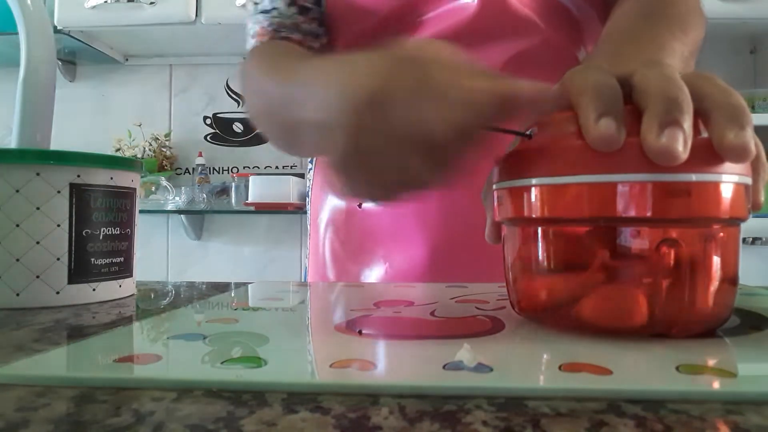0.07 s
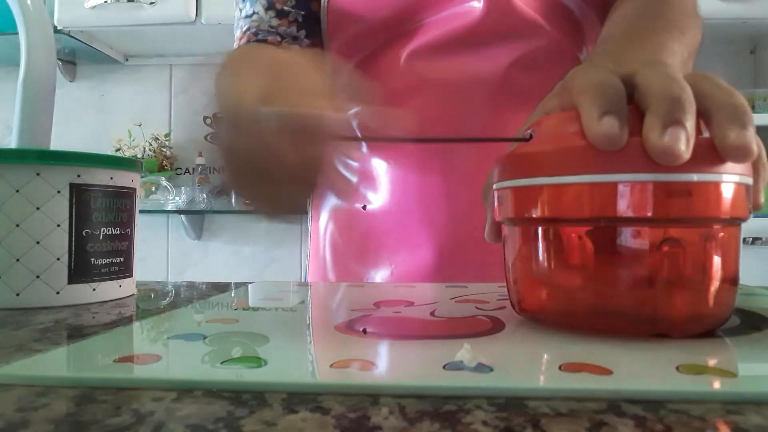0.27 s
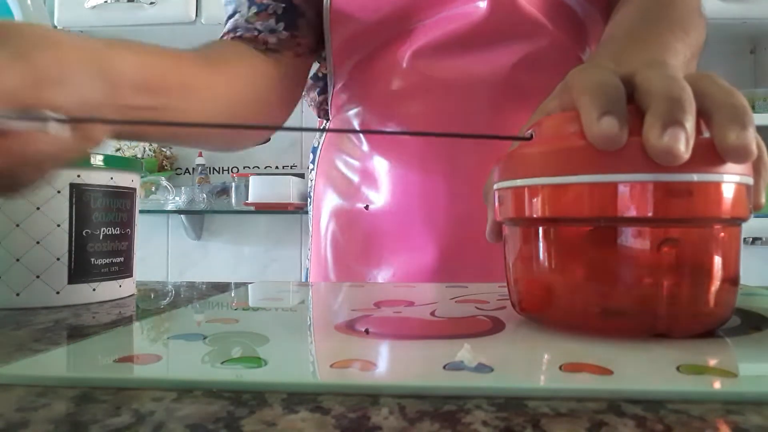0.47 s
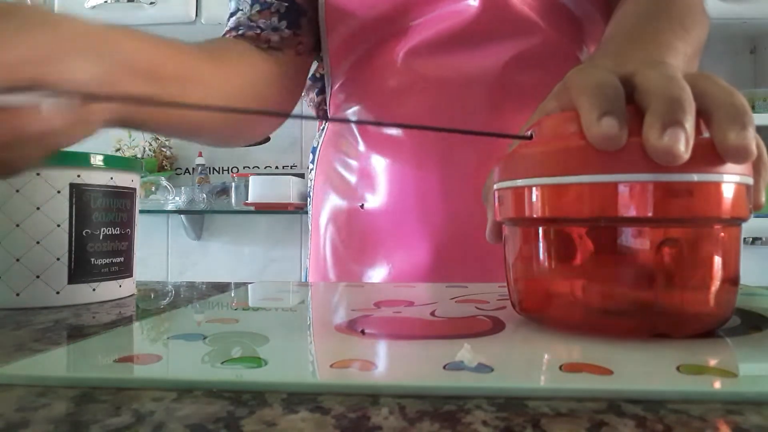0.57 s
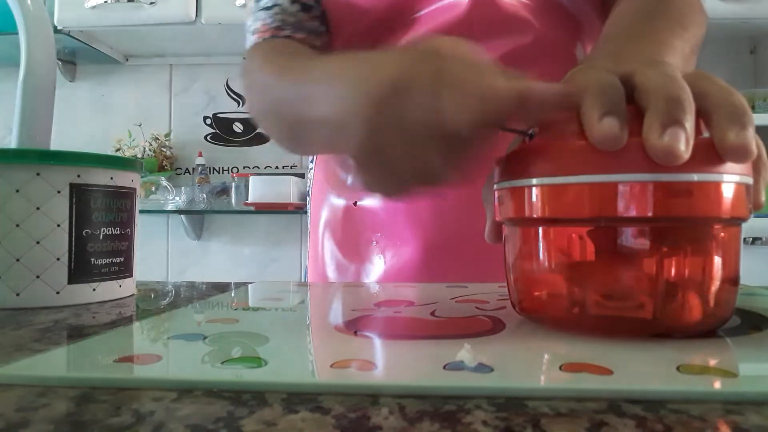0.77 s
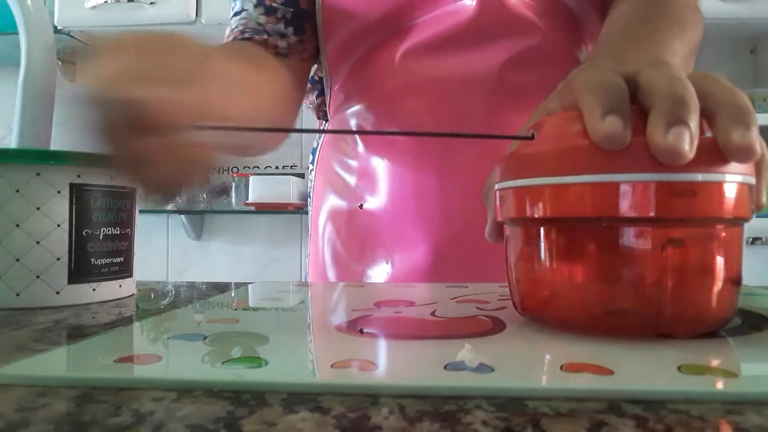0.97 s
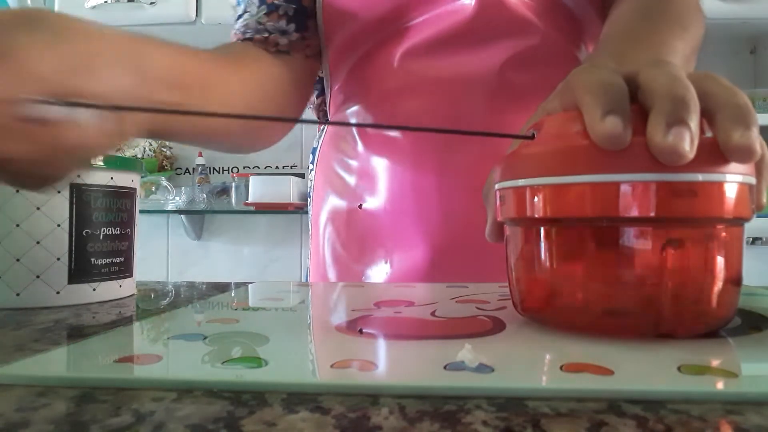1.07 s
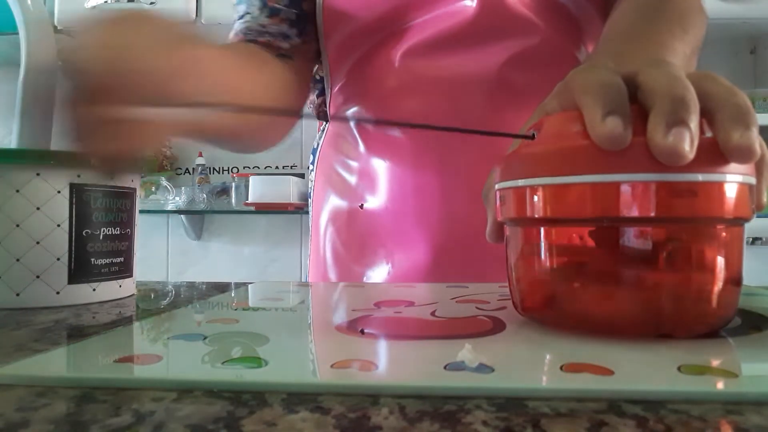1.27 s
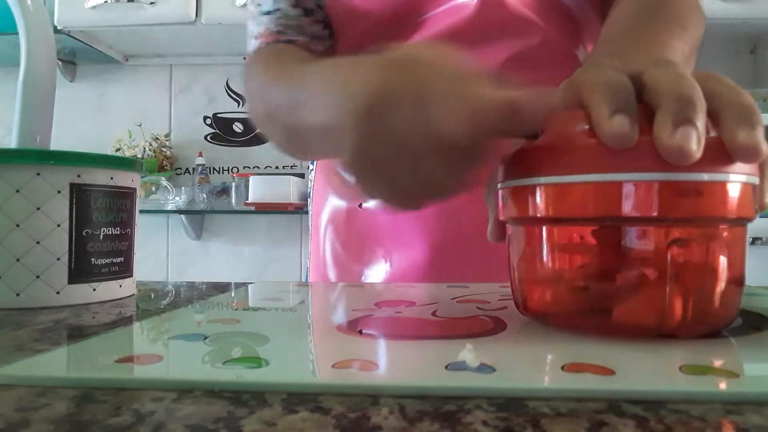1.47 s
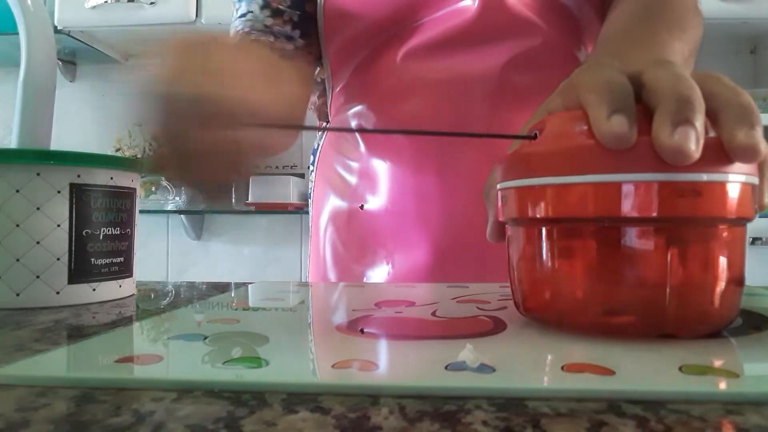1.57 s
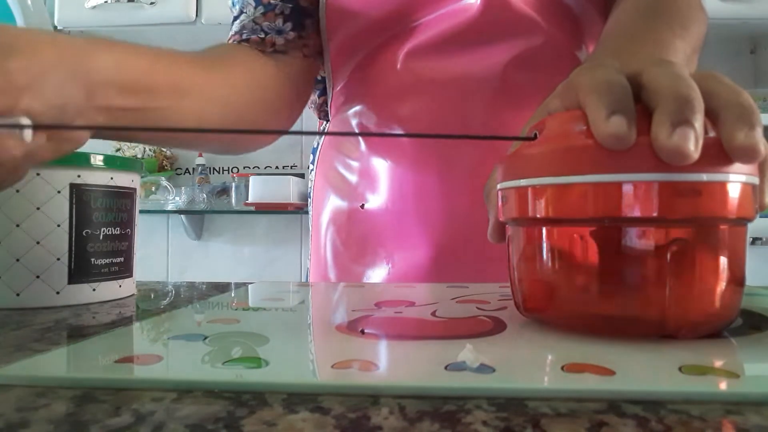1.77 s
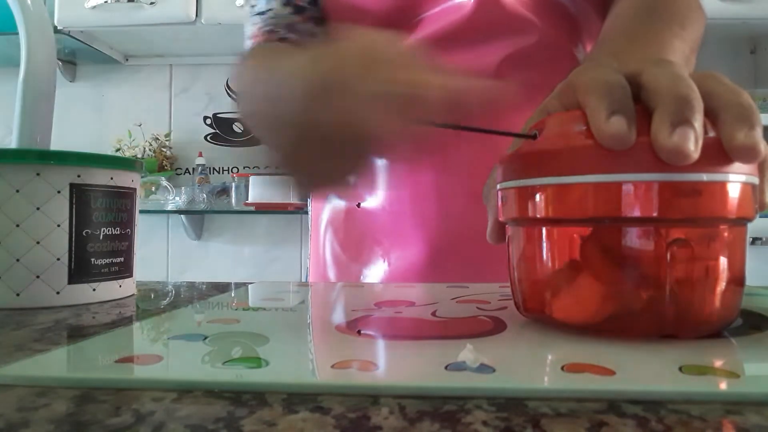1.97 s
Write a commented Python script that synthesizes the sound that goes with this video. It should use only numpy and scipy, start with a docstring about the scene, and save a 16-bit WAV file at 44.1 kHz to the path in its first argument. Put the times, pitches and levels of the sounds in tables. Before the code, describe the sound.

Close microphone on a manual chopper: the cord whirs back softly, then each of three pulls throws cloves clattering around the plastic bowl over a low counter hum, with short room echo and faint steady room noise.

```python
"""A kitchen, with a hand chopper whose cord is pulled three times at close range.
On each pull the blades fling cloves against the plastic bowl: single knocks over a dense tumble,
both noise puffs that excite the modes of the bowl. The shaking bowl wobbles and hums in the counter.
Before, between and after the pulls the spring rewinds the cord with a soft whirr: dense slips
that ring the spool. Tiled walls add a short dull tail, and steady room noise lies beneath."""
import sys
import numpy as np
from scipy import signal
from scipy.fft import rfft, irfft
from scipy.io import wavfile
from scipy.ndimage import uniform_filter1d

SR = 44100
rng = np.random.default_rng(int(sys.argv[2]) if len(sys.argv) > 2 else 0)


def materialize(psi):
    """Save the field psi as 16-bit PCM at rate SR to the path in sys.argv[1].

    A 1-D psi becomes a single channel; in a 2-D psi each row is a channel.
    """
    bounded = np.clip(np.atleast_2d(psi).T, -1, 1)
    quanta = np.round(bounded * 32767).astype(np.int16)
    wavfile.write(sys.argv[1], SR, quanta)


N = 88200  # two seconds

# small pieces tumbling, one curve a pull: start_s, thud_db, knock_db, crack_db, counter_rumble_db
TUMBLE_CURVES = [
    [(.18, -66, -62, -86, -72), (.2, -31.5, -37.5, -51, -51), (.266, -32.5, -43.5, -47, -46),
     (.275, -22, -25.5, -29.5, -38), (.338, -24.5, -32.5, -42, -35.5), (.35, -21.5, -22.5, -33, -39),
     (.41, -18.5, -21.5, -25.5, -40), (.46, -20.5, -24.5, -35, -39.5), (.52, -32.5, -36, -45, -53),
     (.6, -48, -50, -58, -71)],
    [(.865, -76, -45, -68, -61), (.88, -45, -51, -66, -57), (.9, -30.5, -32.5, -38, -58),
     (.93, -25.5, -30.5, -36, -47), (.96, -22, -22, -25.5, -36.5), (1.03, -22.5, -29, -39, -39),
     (1.1, -26, -32, -40.5, -41.5), (1.16, -34.5, -39.5, -51, -47), (1.26, -50, -54, -72, -78)],
    [(1.478, -62, -55, -71, -66), (1.492, -38, -44, -59, -61), (1.52, -28, -30, -35.5, -39),
     (1.57, -20.5, -26, -34.5, -39), (1.63, -22.5, -20.5, -30, -35), (1.69, -20.5, -27.5, -35, -45),
     (1.74, -27.5, -30, -43.5, -36.5), (1.79, -43.5, -44, -55, -53), (1.86, -62, -47, -62, -66)],
]
# cord spool running back, one curve a rewind: start_s, level_db, treble_db and body_db above the usual
REWIND_CURVES = [
    [(0, -40.5, 2.5, 1.5), (.06, -42, -2, 0.5), (.11, -48.5, -2, 2.5), (.18, -66, 2, 5)],
    [(.52, -47.5, 3, 3.5), (.62, -41.5, -0.5, 3), (.72, -44, 0, -2.5), (.8, -49.5, 1.5, -0.5),
     (.86, -67, .1, 9)],
    [(1.17, -43, -7, 1.5), (1.255, -50, 3, 5.5), (1.275, -43, -1, 1.5), (1.35, -45, 3, 0),
     (1.42, -50.5, 1, 1), (1.47, -60, -4, 0)],
    [(1.76, -45, 1, 12), (1.83, -48, -4, 4), (1.88, -39, -3.5, -2), (2, -46.5, 1.5, 2.5)],
]
# resonances of the plastic bowl: mode_hz, width_hz, level_db
BOWL_MODES = [(673, 153, -2), (1090, 300, 2), (2290, 130, -8), (3884, 80, -6.5), (4530, 167, -4.5),
              (6280, 730, -16.5), (8310, 650, -9.5), (9800, 680, -15.5), (10780, 580, -12.5),
              (12500, 600, -20)]
# response of the bowl between its modes: frequency_hz, level_db
BOWL_FLOOR = [(35, -54), (60, -20), (642, -4.5), (773, -9), (1050, 2), (1790, -9), (3270, -12),
              (4520, -10.5), (5450, -16), (15500, -23)]

BOWL_FLOOR_DB = -0.5  # added to the whole bowl floor
BOWL_LEAST_WIDTH = 0.028  # damping: least mode width over mode frequency
SPLIT_HZ = (2600, 6500)  # thud below, knock between, crack above
BASS_CUT_HZ = 278  # the small bodies radiate no bass


def gain_of(db):
    """Level to amplitude: 20 dB is a factor of ten."""
    return 10 ** (np.asarray(db) / 20)


def evened(x):
    """Power normalisation: scales a signal to rms 1."""
    return x / np.sqrt(np.mean(x ** 2) + 1e-20)


def read(points, hz):
    """Spectral interpolation: reads a level table on a log-frequency axis."""
    f, value = np.transpose(points)
    return np.interp(np.log(hz + 1), np.log(f + 1), value)


def coloured_noise(gain):
    """Spectral shaping: white noise filtered by a magnitude curve, at rms 1."""
    return evened(irfft(rfft(rng.standard_normal(N)) * gain, N))


def causal(gain):
    """Minimum phase: the Hilbert transform of log magnitude gives the phase of a causal ring."""
    log_gain = np.log(np.maximum(gain, 1e-5))
    mirrored = np.r_[log_gain, log_gain[-2:0:-1]]
    phase = -signal.hilbert(mirrored).imag[:len(gain)]
    return irfft(gain * np.exp(1j * phase))[:len(gain) // 2]


def body(modes, floor, floor_db, vary_db=0, least_width=0):
    """Modal resonance: Lorentzian peaks over a floor, as three band rings of energy 1 and their powers."""
    hz = np.fft.rfftfreq(4096, 1 / SR)
    f, width, db = np.transpose(modes)[:, :, None]
    width = np.maximum(width, least_width * f)
    peaks = gain_of(2 * (db + vary_db)) / (1 + (2 * (hz - f) / width) ** 2)
    power = gain_of(2 * (read(floor, hz) + floor_db)) + peaks.sum(0)
    power = power / (1 + (BASS_CUT_HZ / (hz + 1)) ** 8)

    low = 1 / (1 + (hz / SPLIT_HZ[0]) ** 8)
    high = 1 / (1 + (SPLIT_HZ[1] / (hz + 1)) ** 12)
    middle = np.clip(1 - low - high, 0, 1)
    bands = [np.sqrt(power * share) for share in (low, middle, high)]
    rings = [causal(band) for band in bands]
    return [ring / np.linalg.norm(ring) for ring in rings], [np.mean(band ** 2) for band in bands]


def curve(tables, column):
    """Amplitude envelope: joins one column of several curves, with 10 ms fades to silence between them."""
    t, out = np.arange(N) / SR, np.zeros(N)
    for table in map(np.array, tables):
        start, end = table[0, 0], table[-1, 0]
        fade = np.clip(np.minimum(t - start + .01, end + .01 - t) / .01, 0, 1)
        out += fade * gain_of(np.interp(t, table[:, 0], table[:, column]))
    return out


def grains(per_s, spread_db, decay_s):
    """Shot noise: contacts at random times and of random size, each a decaying puff of noise."""
    size = gain_of(spread_db * np.minimum(rng.exponential(1, N), 5))
    contacts = size * (rng.random(N) < per_s / SR)
    # powers of overlapping puffs add
    power = signal.lfilter([1], [1, -np.exp(-2 / (decay_s * SR))], contacts ** 2)
    return evened(np.sqrt(power) * rng.standard_normal(N))


def patchy(x):
    """Time-varying filtering: lets the colour of a sound drift in random time-frequency patches."""
    depth_db, patch_hz, patch_s = 2, 600, .05
    window, hop = 256, 64
    z = signal.stft(x, nperseg=window, noverlap=window - hop)[2]
    field = uniform_filter1d(rng.standard_normal(z.shape), round(patch_hz * window / SR), 0)
    field = evened(uniform_filter1d(field, round(patch_s * SR / hop), 1))
    return signal.istft(z * gain_of(depth_db * field), nperseg=window, noverlap=window - hop)[1][:N]


def kitchen():
    """Stationary noise: the steady room sound is random noise with a fixed spectrum."""
    # colour of the room noise: frequency_hz, level_db
    room_spectrum = [(24, -42), (40, -19), (350, 13), (535, -22), (1280, 8.5), (3390, -5), (5300, -7),
                     (6010, -17), (15500, -17)]
    level_db = -53
    hz = np.fft.rfftfreq(N, 1 / SR)
    return gain_of(level_db) * coloured_noise(gain_of(read(room_spectrum, hz)))


def room(x):
    """Reverberation: tiled walls return a short dull tail, modelled as decaying low-passed noise."""
    t60_s, level_db, lowpass_hz = 0.3, -17, 5400
    t = np.arange(SR // 3) / SR
    tail = rng.standard_normal(len(t)) * gain_of(-60 * t / t60_s) * (t > .004)
    tail = signal.lfilter([1], [1, -np.exp(-2 * np.pi * lowpass_hz / SR)], tail)
    return gain_of(level_db) * signal.fftconvolve(x, tail / np.linalg.norm(tail))[:N]


def counter():
    """Structure-borne sound: the shaking bowl drives the modes of the board and jolts it now and then."""
    # resonances of the board under the bowl: mode_hz, width_hz, level_db
    board_modes = [(124, 28, 0), (217, 56, 1.5)]
    # jolts of the bowl on the counter: start_s, level_db
    bowl_jolts = [(.268, -51), (.335, -48), (0.377, -30), (.935, -50), (1.619, -27.5)]
    rewind_db = -15.5  # hum relative to the rewind level
    jolt_hz, jolt_s = 61.7, 0.021

    t, hz = np.arange(N) / SR, np.fft.rfftfreq(N, 1 / SR)
    response = sum(gain_of(db) / (1 + (2 * (hz - f) / width) ** 2) for f, width, db in board_modes)
    drive = curve(TUMBLE_CURVES, 4) + curve(REWIND_CURVES, 1) * gain_of(rewind_db)
    out = coloured_noise(response) * drive
    for start_s, db in bowl_jolts:
        swell = np.sin(np.pi * np.clip((t - start_s) / jolt_s, 0, 1)) ** 2
        out += gain_of(db) * swell * np.cos(2 * np.pi * jolt_hz * (t - start_s - jolt_s / 2))
    return out


def rewind():
    """Stick-slip excitation: dense slips of the cord ring the spool, and their level flutters."""
    # resonances of the spool: mode_hz, width_hz, level_db
    spool_modes = [(352, 100, -1), (664, 180, -4), (966, 43, 1.5), (1294, 88, 2.5), (2100, 93, -3.5),
                   (2610, 160, -2), (4000, 98, -13), (4560, 440, -0.5), (5230, 590, -7.5), (8730, 86, -7),
                   (10600, 220, -15), (12600, 200, -16), (13600, 590, -15.5)]
    # response of the spool between its modes: frequency_hz, level_db
    spool_floor = [(35, -75), (60, -32), (123, 34), (248, -26), (376, 11.5), (423, -0.5), (1320, -1),
                   (1740, -9.5), (4630, -8.5), (15500, -28)]
    floor_db, least_width = -5, 0.013  # offset of the floor; least mode width over mode frequency
    flutter_db, flutter_s = 0.5, 0.011
    slips_per_s, slip_spread_db, slip_decay_s = 1600, 2, 0.0013

    rings, power = body(spool_modes, spool_floor, floor_db, 0, least_width)
    level = curve(REWIND_CURVES, 1)
    colours = (curve(REWIND_CURVES, 3), 1, curve(REWIND_CURVES, 2))  # body, middle, treble
    out = np.zeros(N)
    for ring, band_power, colour in zip(rings, power, colours):
        flutter = evened(uniform_filter1d(rng.standard_normal(N), round(flutter_s * SR)))
        slips = grains(slips_per_s, slip_spread_db, slip_decay_s) * level * gain_of(flutter_db * flutter)
        # bands keep their natural balance about the middle one
        out += signal.oaconvolve(slips * colour, ring)[:N] * np.sqrt(band_power / power[1])
    return patchy(out)


def wobble():
    """Low-order resonance: random contacts excite one dull, heavily damped mode of the whole bowl."""
    mode_hz, width_hz, level_db = 557, 347, -21  # width of each of two filter passes
    growth = 0.54  # below 1: grows more slowly than the tumble, so it colours the start of a pull
    radius, turn = np.exp(-np.pi * width_hz / SR), 2 * np.pi * mode_hz / SR
    zeros, poles = [1, 0, -1], [1, -2 * radius * np.cos(turn), radius ** 2]
    ring = grains(150, 3, .002)
    for _ in range(2):
        ring = signal.lfilter(zeros, poles, ring)
    return gain_of(level_db) * evened(ring) * curve(TUMBLE_CURVES, 1) ** growth


def tumble():
    """Superposed impacts: small contacts at four spots of the bowl, each exciting its modes differently."""
    contacts_per_s, spread_db, decay_s = 1200, 2.4, .0009  # rate over all four spots
    colour_db = 3  # spread of the mode levels from spot to spot
    out = np.zeros(N)
    for chance in rng.standard_normal((4, len(BOWL_MODES), 1)):
        contacts = grains(contacts_per_s / 4, spread_db, decay_s) / 2  # four spots add up to power 1
        rings, _ = body(BOWL_MODES, BOWL_FLOOR, BOWL_FLOOR_DB, colour_db * chance, BOWL_LEAST_WIDTH)
        for k, ring in enumerate(rings):
            out += signal.oaconvolve(contacts * curve(TUMBLE_CURVES, k + 1), ring)[:N]
    return out


def knocks():
    """Impact excitation: each blow is a noise puff that rings the bowl in the colour of its own spot."""
    # cloves struck by the blades or thrown against the bowl: start_s, thud_db, knock_db, crack_db, knock_hz
    clove_hits = [(0.055, -27.5, -29, -47, 4670), (0.204, -17, -23, -27, 4870),
                  (0.2257, -25.5, -41, -41, 4320), (0.231, -17.5, -32, -25, 4730),
                  (0.2393, -30, -27, -37, 4380), (0.2547, -40, -19, -32, 4360),
                  (0.258, -15, -26, -40, 4340), (0.2705, -23, -6.5, -13.5, 4520),
                  (0.2765, -16, -12, -14.5, 4540), (0.2881, -10.5, -5.5, -24, 4620),
                  (0.301, -23, -21, -18, 5960), (0.3158, -23, -11.5, -19, 4500),
                  (0.322, -30, -20, -28, 4560), (0.3441, -25, -7.5, -14, 6030),
                  (0.3509, -24, -12, -14, 4630), (0.361, -15, -20, -22, 3890),
                  (0.3652, -11, -12.5, -17, 4360), (0.3751, -3.5, -5, -10, 4570),
                  (0.3901, -12, -3.5, -4, 4430), (0.3963, -20, -8, -0.5, 4370), (0.4033, 0, -13, -9, 4400),
                  (0.4115, -16, -12, -20, 4400), (0.421, -6, -24, -17, 4640), (0.4253, -21, -9, -24, 4000),
                  (0.4315, -10.5, -20, -24, 4400), (0.447, -10, -5, -15, 4460),
                  (0.466, -10.5, -24, -32, 4500), (0.4795, -36, -13, -37, 4000),
                  (0.7915, -31, -33.5, -51, 3975), (0.874, -31, -31, -44, 4440),
                  (0.8927, -15.5, -7.5, -21, 4700), (0.9076, -8.5, -3.5, -12.5, 4400),
                  (0.912, -8.5, -13, -19, 4500), (0.936, -41, -26, -31, 6140),
                  (0.9403, -27, -39, -7.5, 5450), (0.947, -3.5, -2, -10.5, 4070),
                  (0.9601, -12.5, -12, -23, 6450), (0.9704, -3.5, -16, -11.5, 4400),
                  (0.975, -34, -7, -23, 4400), (0.993, -35, -13, -23, 4600), (1.002, -18, -26, -30, 4400),
                  (1.012, -18, -11, -24, 4000), (1.0219, -14.5, -14, -27, 4430),
                  (1.0319, -26, -10, -24, 4580), (1.042, -15, -34, -30, 5150), (1.055, -24, -18, -21, 3830),
                  (1.0807, -27, -11.5, -28, 4410), (1.1088, -15.5, -15, -22, 4160),
                  (1.161, -21, -40, -43, 4500), (1.151, -41, -31, -36, 6100),
                  (1.343, -30.5, -26, -35, 4560), (1.4194, -27.5, -42, -55, 4430),
                  (1.435, -29.5, -34, -63, 4040), (1.4889, -25, -27, -46, 3780),
                  (1.509, -31, -11.5, -22, 4630), (1.5218, -26, -16, -19, 4550),
                  (1.528, -2.5, -13, -11.5, 3250), (1.5534, -9, -11, -14, 4000),
                  (1.5706, -23, -41, -19, 5860), (1.5836, 0.5, -2.5, -6.5, 4520),
                  (1.5986, -13, -35, -29, 3580), (1.614, -5.5, 0, -10, 4040), (1.6274, -2, -6, -8, 4650),
                  (1.645, -12, -6, -13, 4300), (1.6521, -4, -21, -28, 4400), (1.6627, -17, -11, -22, 5160),
                  (1.669, -5.5, -25, -31, 4100), (1.678, -9, -11.5, -31, 3030),
                  (1.6826, -8, -13, -27, 3970), (1.706, -13.5, -16, -30, 4300),
                  (1.7263, -20, -23, -40, 3300), (1.736, -28, -23, -38, 4600),
                  (1.9019, -34, -39, -44, 4460), (1.9463, -31, -37, -38, 4560)]
    rise_s, decays_s = .00025, (.0008, .0012, .0013)  # decays of thud, knock, crack
    # the struck spot rings on top; the levels of the other modes vary
    spot_db, spot_width_hz, spot_spread_db = 4, 320, 3.5

    t, out = np.arange(500) / SR, np.zeros(N)
    puffs = rng.standard_normal((len(clove_hits), len(t)))
    chances = rng.standard_normal((len(clove_hits), len(BOWL_MODES), 1))
    for (start_s, *levels_db, knock_hz), puff, chance in zip(clove_hits, puffs, chances):
        modes = list(BOWL_MODES) + [(knock_hz, spot_width_hz, spot_db)]
        vary_db = spot_spread_db * np.r_[np.clip(chance, -2, 1), [[0]]]
        rings, _ = body(modes, BOWL_FLOOR, BOWL_FLOOR_DB, vary_db, BOWL_LEAST_WIDTH)
        for ring, decay_s, level_db in zip(rings, decays_s, levels_db):
            blow = puff * (1 - np.exp(-t / rise_s)) * np.exp(-t / decay_s)
            knock = signal.fftconvolve(blow, ring)
            knock = knock / abs(knock).max() * gain_of(level_db)
            part = out[round(start_s * SR):][:len(knock)]
            part += knock[:len(part)]
    return out


def scene():
    """Superposition: the chopper, its echo, the board and the room noise add linearly."""
    chopper = knocks() + tumble() + wobble() + rewind()
    return (chopper + room(chopper) + counter() + kitchen())[None]


def record(dry):
    """Saturation and band limiting: soft overload, a bass roll-off, then a steep treble edge."""
    bass_cut_hz, treble_edge_hz, ceiling = 65, 15720, 1.05
    soft = ceiling * np.tanh(dry / ceiling)
    soft = signal.sosfilt(signal.butter(2, bass_cut_hz, "high", fs=SR, output="sos"), soft)
    lowpass = signal.firwin(1023, treble_edge_hz, window=("kaiser", 10), fs=SR)
    return signal.oaconvolve(soft, lowpass[None], "same")


dry = scene()
out = record(dry)
materialize(out)
```